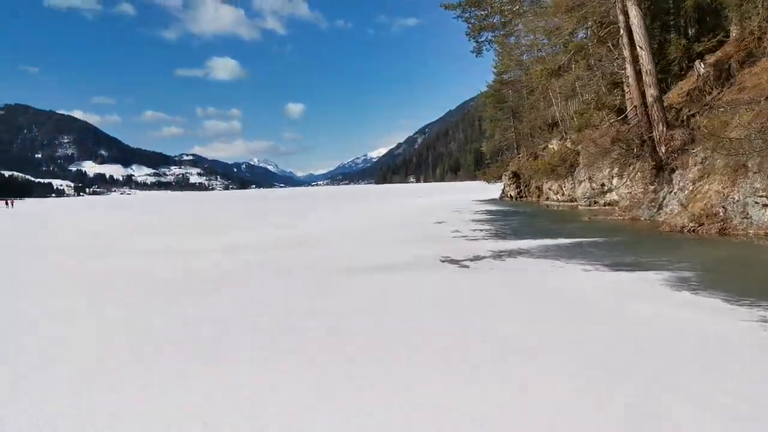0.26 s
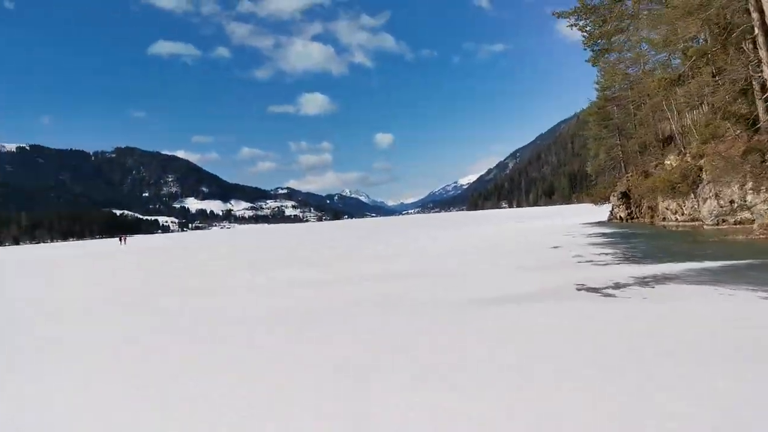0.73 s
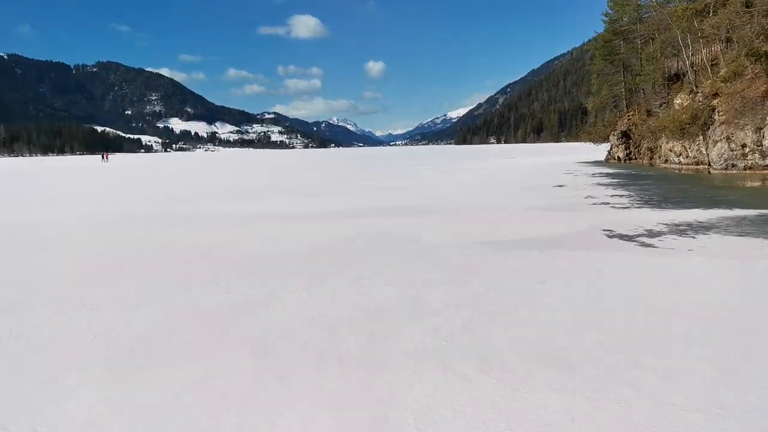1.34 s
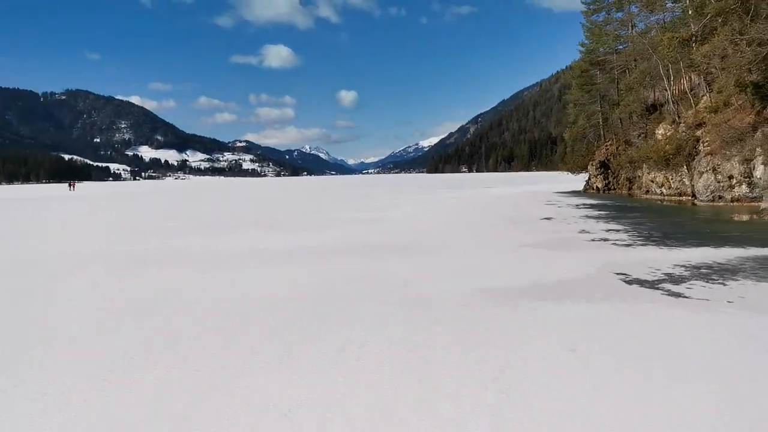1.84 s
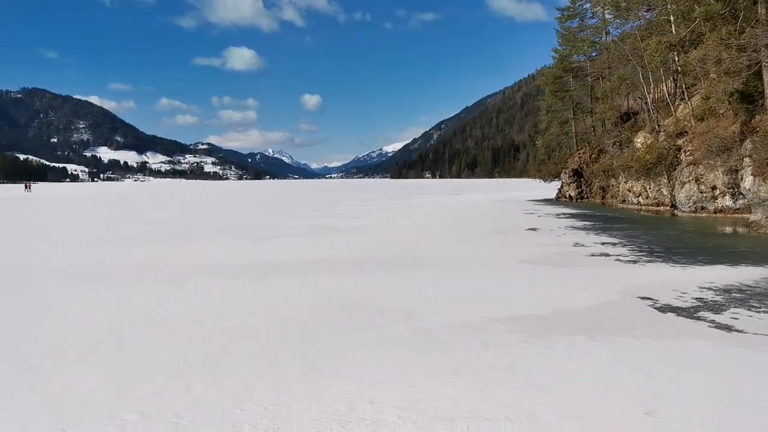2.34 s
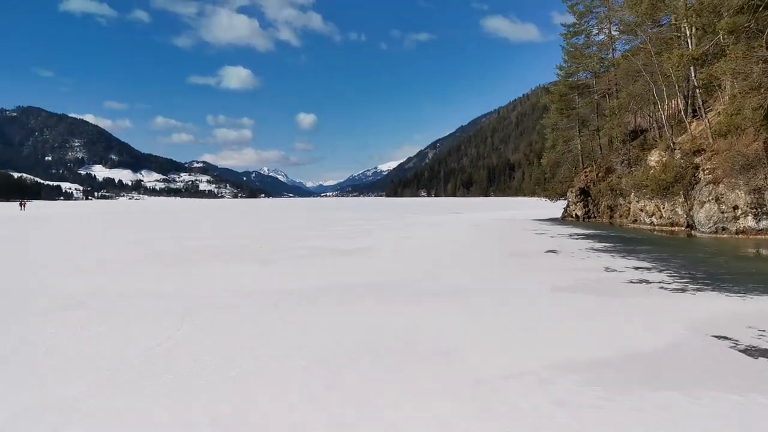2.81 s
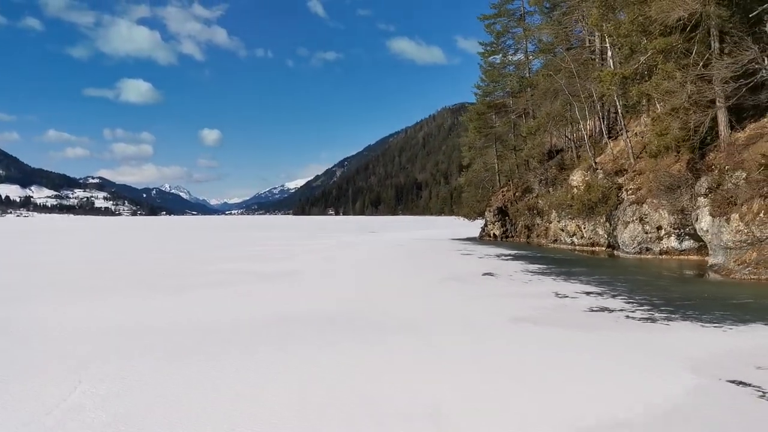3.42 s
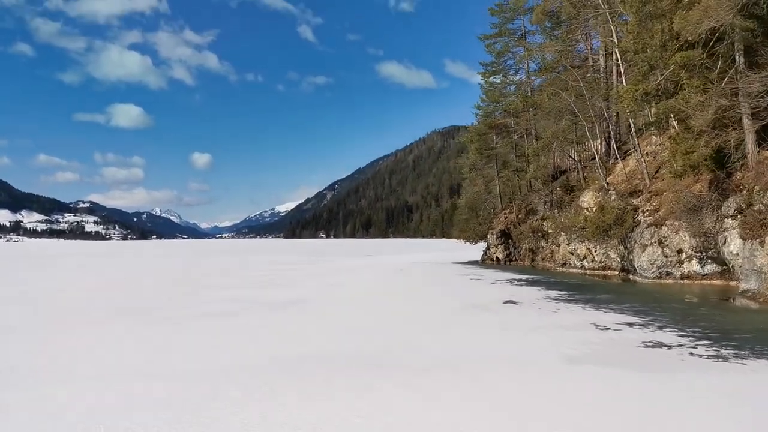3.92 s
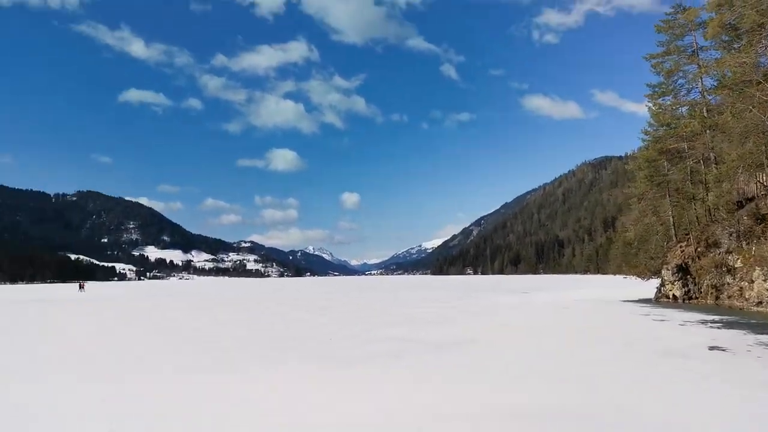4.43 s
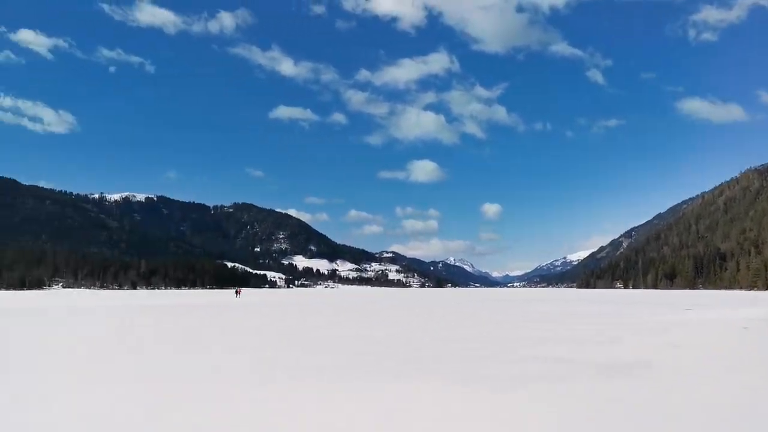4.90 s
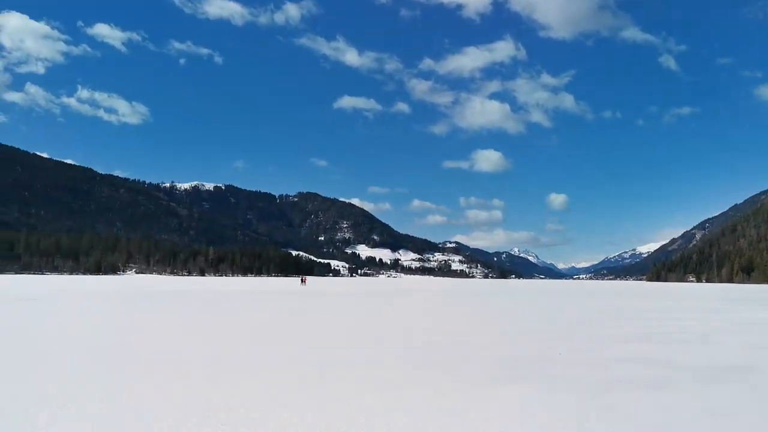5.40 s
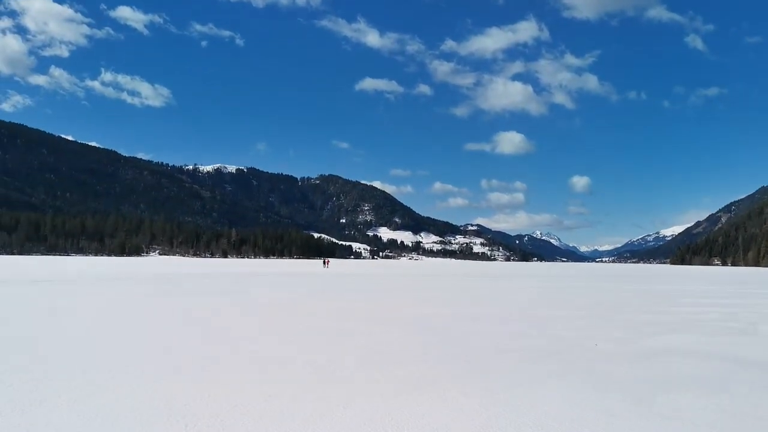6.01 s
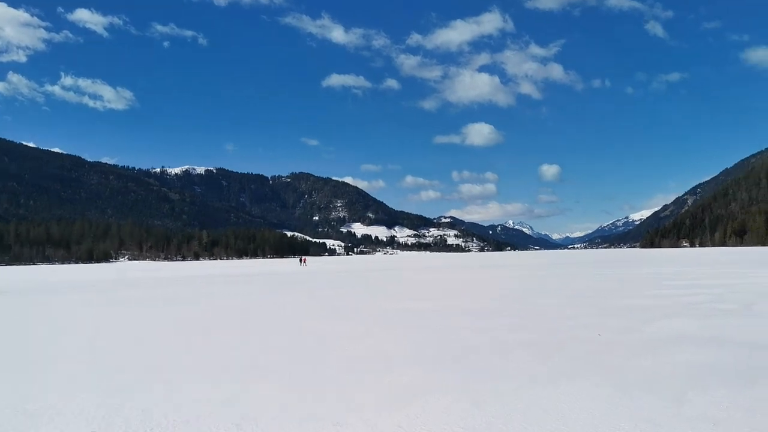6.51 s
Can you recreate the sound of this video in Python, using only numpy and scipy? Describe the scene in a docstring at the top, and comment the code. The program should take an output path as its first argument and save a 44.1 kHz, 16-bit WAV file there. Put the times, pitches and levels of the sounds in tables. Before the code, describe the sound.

Sharp icy snaps and gritty scraping under gliding skates thin out over a frozen lake, ending in a loud, fluttering wind buffet.

```python
"""Skating on snow-dusted lake ice

A skater glides along holding a camera. The crust snaps under the blades in sharp cracks, each a burst of
quick breaks that the ice sheet bends into a short falling chirp. Crushed crystals crunch where an edge scrapes;
the blades rumble softly in wandering noise bands and powder hisses along the steel.
Near the end a gust builds: low noise and fluttering roar buffet mainly the right microphone port."""
import sys
import numpy as np
from scipy import signal
from scipy.fft import rfft, irfft, next_fast_len
from scipy.io import wavfile
from scipy.ndimage import uniform_filter1d, map_coordinates

SR = 44100
rng = np.random.default_rng(int(sys.argv[2]) if len(sys.argv) > 2 else 0)


def file_out(sig):
    """Save sig as 16-bit WAV at sys.argv[1]."""
    # one column per channel
    cols = np.atleast_2d(sig).T
    # limit, then scale
    lim = np.clip(cols, -1, 1)
    pcm = np.round(lim * 32767).astype(np.int16)
    wavfile.write(sys.argv[1], SR, pcm)


N = 297675


def amp(db):
    """Decibels to gain."""
    return 10 ** (np.asarray(db) / 20)


def unit(x):
    """x scaled to rms 1."""
    return x / np.sqrt(np.mean(np.abs(x) ** 2) + 1e-20)


def along(points, hz):
    """(frequency [Hz], value) points read on a log-frequency axis."""
    f, value = np.transpose(points)
    return np.interp(np.log(hz + 1), np.log(f + 1), value)


def wobble(rate):
    """A smooth random curve with rate knots a second."""
    knots = rng.standard_normal(int(N * rate / SR) + 4)
    return map_coordinates(knots, [np.arange(N) * rate / SR])


def filtered(x, response):
    """x through a complex response of frequency."""
    m = 2 * next_fast_len(N // 2 + SR // 4)
    hz = np.fft.rfftfreq(m, 1 / SR)
    return irfft(rfft(x, m) * response(hz), m)[..., :N]


def causal(gain):
    """The minimum-phase response with this gain: it rings only after it is struck."""
    cepstrum = irfft(np.log(np.maximum(gain, 1e-6)))
    half = cepstrum.shape[-1] // 2
    cepstrum[1:half] *= 2
    cepstrum[half + 1:] = 0
    return np.exp(rfft(cepstrum))


def noise(spectrum, channels):
    """Unrelated coloured noises, together at rms 1."""
    white = rng.standard_normal((channels, N))
    return unit(filtered(white, lambda hz: amp(along(spectrum, hz))))


def grains(rate, spread_db):
    """Random impulses of very unequal size, rate a second, rms 1."""
    size = amp(spread_db * np.minimum(rng.exponential(size=N), 4))
    struck = rng.random(N) < rate / SR
    return unit(struck * size * rng.choice([-1, 1], N))


def patchy(x, depth_db, size=8):
    """Short-lived random resonances, a few hundred Hz wide and size frames long."""
    z = signal.stft(x, nperseg=256)[2]
    across_hz = uniform_filter1d(rng.standard_normal(z.shape), 2, 0)
    field = uniform_filter1d(across_hz, size, 1)
    return unit(signal.istft(z * amp(depth_db * unit(field)), nperseg=256)[1][:N])


def drone(hz, width_hz, wander):
    """A narrow band of noise whose pitch wanders, rms 1."""
    phase = 2 * np.pi * np.cumsum(hz * (1 + wander * wobble(6.7))) / SR
    return unit(wobble(width_hz) * np.cos(phase) + wobble(width_hz) * np.sin(phase))


CALM_DB = -74  # floor of the right port's curve
# the left port lies in the lee: where both ports agree [dB], and the share of a rise above it that gets there
LEE_EVEN_DB, LEE_SHARE = -68.5, 0.47


def swells(rows, rise_db_per_s, fall_db_per_s):
    """Each row rises, holds and dies away; the sheltered left port feels only part: dB, left and right."""
    t = np.arange(N) / SR
    levels = []
    for start, end, db in rows:
        before, after = np.maximum(start - t, 0), np.maximum(t - end, 0)
        levels.append(db - rise_db_per_s * before - fall_db_per_s * after)
    right = np.maximum(np.max(levels, axis=0), CALM_DB)
    left = LEE_EVEN_DB + LEE_SHARE * (right - LEE_EVEN_DB)
    return np.array([left, right])


# gusts at the right port, short peaks riding on long ones: (start [s], end [s], level before trims [dB])
GUST_SWELLS = [(0.175, 0.218, -46), (0.795, 0.874, -42), (5.297, 5.813, -42.5), (5.444, 5.55, -34.5),
               (6.21, 6.735, -25.5), (6.272, 6.29, -22.5), (6.333, 6.358, -22.5), (6.472, 6.518, -17),
               (6.574, 6.655, -17), (6.68, 6.7, -22)]
# colour of light wind on a port: (frequency [Hz], level [dB])
BREEZE_COLOUR = [(20,-15.5),(60,-1.5),(120,-8),(220,-14),(400,-43),(1000,-51),(3000,-100)]
# colour of strong wind on a port: (frequency [Hz], level [dB])
GALE_COLOUR = [(25,-32),(70,-5),(120,4),(200,0.5),(320,-5),(500,-21),(800,-34),(1300,-39),(2500,-68),(5000,-99)]


def gust_thumps(lump_db=1.5, gale_db=1.5, breeze_db=2.5, steepen=0.68):
    """Wind pressure thumps on each port separately; strong wind adds a second colour that drops away faster."""
    db = swells(GUST_SWELLS, rise_db_per_s=480, fall_db_per_s=290)
    db = db + lump_db * np.array([wobble(45), wobble(45)])
    light_db = np.minimum(db + breeze_db, -29)
    strong_db = db + gale_db + steepen * np.minimum(db + 22, 0)
    return amp(light_db) * noise(BREEZE_COLOUR, channels=2) + amp(strong_db) * noise(GALE_COLOUR, channels=2)


# eddies in the strong gust, at the right port: (start [s], end [s], level [dB])
EDDY_SWELLS = [(6.21, 6.244, -28.5), (6.276, 6.301, -23), (6.329, 6.347, -25.5), (6.39, 6.46, -32),
               (6.469, 6.492, -21), (6.51, 6.527, -25), (6.569, 6.644, -17), (6.678, 6.69, -22.5),
               (6.732, 6.742, -30)]
# colour of their roar: (frequency [Hz], level [dB])
ROAR_COLOUR = [(120,-25),(320,1),(600,-2.5),(850,-10),(1150,-18.5),(1500,-24),(2500,-47),(5000,-90)]


def eddy_roar(flutter_db=11.5):
    """Eddies tear off the casing with a roar that flutters alike at both ports."""
    flutter = unit(amp(flutter_db * np.tanh(wobble(260))))
    db = swells(EDDY_SWELLS, rise_db_per_s=1500, fall_db_per_s=903)
    return amp(db) * flutter * noise(ROAR_COLOUR, channels=2)


PORT_LIMIT = 0.94  # strongest pressure that wind can build up in a port (1 = full scale)


def wind():
    """Thumps and roar press on the ports, which saturate softly."""
    return PORT_LIMIT * np.tanh((gust_thumps() + eddy_roar()) / PORT_LIMIT)


# steady gliding, before trims: (time [s], rumble level [dB], hiss level [dB])
GLIDE_LEVELS = [(0, -75, -44), (.2, -53, -47.5), (.45, -60.5, -52), (.8, -49.5, -47), (1.05, -57.5, -52.5),
                (1.3, -52, -50), (1.7, -62, -50), (2.2, -53, -51.5), (3.4, -56, -51), (4.25, -49, -50),
                (4.6, -57.5, -53), (5.15, -47.5, -54.5), (5.4, -55, -54.5), (5.83, -51.5, -54),
                (6.4, -61, -52), (6.62, -61, -58.5)]


def glide_levels():
    """The rumble and hiss faders of the glide, in dB for every sample."""
    s, rumble_db, hiss_db = np.transpose(GLIDE_LEVELS)
    t = np.arange(N) / SR
    return np.interp(t, s, rumble_db), np.interp(t, s, hiss_db)


# colour of the blades' broad rumble: (frequency [Hz], level [dB])
RUMBLE_COLOUR = [(30,-7.5),(80,-1.5),(135,6.5),(240,-1),(350,-9.5),(700,-35),(1500,-46),(3000,-52.5)]


def blade_rumble(level_db):
    """The gliding blades drone in two wandering bands over a broad rumble."""
    rumble = amp(1.5) * noise(RUMBLE_COLOUR, channels=1)[0]
    rumble += amp(-7.0) * drone(130, 35, wander=0.075)
    rumble += amp(-4.0) * drone(230, 35, wander=0.09)
    return amp(level_db + 3.1 * wobble(7)) * rumble


# differences between the ports, as sound from the feet bends round the camera
# (frequency [Hz], left minus right [dB])
PORT_BALANCE = [(300,-.4),(600,-1.5),(1100,-5.5),(1650,-10.5),(2100,-6),(2650,7.5),(3600,0),(5500,3.7),(6300,12),(7700,7),(9000,2.4),(11000,0)]
# (frequency [Hz], left lead [radians])
PORT_LEAD = [(130,-.25),(450,-.6),(1150,-1.5),(1600,-1.25),(2100,-.55),(2500,-.7),(2800,-3.3),(4300,-3.8),(4900,-5.6),(6100,-6.8),(6800,-9.4),(8200,-12.4)]


def ports(x):
    """The camera's body shades and delays sound differently at its two ports."""
    def response(hz):
        tilt = amp(along(PORT_BALANCE, hz) / 2) * np.exp(.5j * along(PORT_LEAD, hz))
        pair = np.array([tilt, 1 / tilt])
        return pair / np.sqrt(np.mean(np.abs(pair) ** 2, axis=0))
    return filtered(x, response)


# colour of powder along the steel: (frequency [Hz], level [dB])
HISS_COLOUR = [(150,-19),(600,3.5),(1200,1.5),(2000,2),(2900,-5),(4200,-5.5),(6000,-7.5),(7400,-1.5),(9500,-33.5),(14500,-29),(16000,-43)]


def powder_hiss(level_db):
    """Powder hisses along the steel: one noise shared by the ports, and a weaker one unrelated between them."""
    shared = amp(-5.0) * ports(noise(HISS_COLOUR, channels=1)[0])
    return amp(level_db) * (shared + amp(-12.5) * noise(HISS_COLOUR, channels=2))


def crystal_ticks(level_db):
    """Single crystals tick between the cracks, each with its own colour."""
    return amp(level_db + 0.5) * patchy(grains(rate=260, spread_db=4.5), depth_db=5.0)


# colour of blade and ice at the microphones: (frequency [Hz], relative level [dB])
ICE_COLOUR = [(45,-22),(130,-4.5),(330,1.5),(650,0.5),(1100,-2.5),(1550,-4.5),(2000,-3.5),(2650,-15),(3300,-12.5),(3800,-10.5),(6200,-19.5),(7600,-19),(9600,-47.5),(14500,-55),(16000,-64)]


def ice_sheet(force, lag_s=0.000827):
    """Bending waves carry treble faster than bass: lag_s is their delay at 1 kHz."""
    def response(hz):
        bend = np.exp(-4j * np.pi * lag_s * np.sqrt(1000 * hz))
        return unit(causal(amp(along(ICE_COLOUR, hz)))) * bend
    return filtered(force, response)


def scatter(x, decay_s=0.00065, db=-2.5, left_db=3.5, size=2048):
    """Treble spreads off the skater's body and the ice, unrelated at the ports and a little stronger on the left."""
    treble = filtered(x, lambda hz: hz > 4000)
    fade = np.exp(-np.arange(size) / SR / decay_s)
    power = np.abs(signal.fftconvolve(treble ** 2, fade / fade.sum())[:N])
    colour = [(200, -20), (1000, -8.0), (2600, 12.0), (3600, -10.0), (5000, -2.5),
              (7300, 5.5), (9500, -16.5), (15000, -25.5)]
    sides = amp([[left_db / 2], [-left_db / 2]])
    return amp(db) * np.sqrt(power) * noise(colour, channels=2) * sides


# an edge bites as it sets in: extra level, strongest at the start, and how fast that fades
BITE_DB, BITE_S = 2.5, 0.0033
# a loaded blade thrums: pitch, width, share of the scrape, and the scrape level above which it is full
THRUM_HZ, THRUM_WIDTH_HZ, THRUM_SHARE, THRUM_FULL_DB = 355, 70, 0.9, -26
# an edge scrapes through snow, before snow and ice colour it; the sign of chatter is ignored:
# (start [s], end [s], level [dB], brightness [dB], chatter [dB])
EDGE_SCRAPES = [(0, 0.015, -27, 3, -2), (0.018, 0.07, -25, -1.5, 1.5), (0.073, 0.129, -37, 7.5, 1.5),
                (0.13, 0.168, -31, 6, -2.5), (0.203, 0.233, -35.5, 10.5, 19), (0.559, 0.565, -42, 10, 4.5),
                (0.663, 0.697, -37, 2.5, -8), (0.834, 0.937, -47.5, 6.5, 5), (0.947, 0.974, -57.5, 16, 3),
                (1.249, 1.275, -39.5, 11.5, -2), (1.278, 1.335, -48.5, 18, 4),
                (1.362, 1.384, -47.5, 13.5, 7), (1.459, 1.5, -43, 10.5, 20), (1.532, 1.56, -54.5, 18, 14),
                (1.567, 1.594, -56.5, 24.5, 6), (1.733, 1.802, -45.5, 4.5, 5),
                (1.842, 1.901, -38, 0.5, -11), (2.068, 2.125, -44, 5, 7), (2.338, 2.355, -38, -1, 23),
                (2.387, 2.405, -38, 2.5, -1), (2.555, 2.57, -32, -2, 3), (2.579, 2.628, -38.5, 1.5, 2),
                (2.646, 2.682, -45, 6.5, 19), (2.76, 2.775, -33.5, -7, -2), (2.822, 2.834, -36.5, 0, 3),
                (2.92, 2.944, -39, 0, 5), (2.941, 2.983, -43.5, 10.5, 5), (2.993, 3.013, -39.5, 2, 7),
                (3.069, 3.122, -43, 6, 8), (3.124, 3.145, -33, 2, -1), (3.275, 3.285, -42, 8.5, 8),
                (3.318, 3.422, -46, 5, 9), (3.499, 3.535, -39.5, 9, -6.5), (3.557, 3.58, -42.5, 3, -4),
                (3.597, 3.648, -44.5, 8, 5), (3.837, 3.877, -46, 10, -1), (4.009, 4.041, -34.5, 7.5, -10.5),
                (4.018, 4.118, -45.5, 5.5, 2), (4.124, 4.141, -30.5, 2.5, 4), (4.208, 4.321, -32, 4, 0.5),
                (4.334, 4.344, -31.5, 2.5, -1), (4.37, 4.394, -35, -1.5, 0),
                (4.403, 4.428, -30.5, -2.5, -2), (4.464, 4.495, -31, -3, -13),
                (4.517, 4.567, -54.5, 14, 14), (4.69, 4.77, -55, 6, 7), (4.877, 4.893, -40.5, 0.5, 5),
                (5.169, 5.24, -46.5, 4.5, 13), (5.456, 5.47, -38.5, 1, 15), (5.866, 5.886, -34, 1, 14),
                (5.917, 5.934, -36, 0.5, 2), (5.94, 5.967, -43, 3.5, 3), (6.051, 6.079, -61.5, 22.5, 2),
                (6.233, 6.317, -36.5, -5, 1), (6.405, 6.446, -36.5, 3, 2)]


def scrapes(rate=3500, spread_db=3, patchy_db=3.0, edge_s=0.0038, split_hz=1150, low_db=-5):
    """Snow crystals crush densely under an edge that bites in, then runs evenly or chatters; a loaded blade thrums."""
    t, chatter = np.arange(N) / SR, np.tanh(wobble(140))
    body, fizz, thrum = np.zeros((3, N))
    for start, end, db, bright_db, chatter_db in EDGE_SCRAPES:
        near = slice(max(round((start - edge_s) * SR), 0), round((end + edge_s) * SR))
        age = t[near] - start
        fade_in = np.clip(age / edge_s + .5, 0, 1)
        contact = fade_in * np.clip((end - t[near]) / edge_s + .5, 0, 1)
        bite_db = BITE_DB * np.exp(-np.abs(age) / BITE_S)
        drag = contact * amp(abs(chatter_db) * chatter[near] + bite_db)
        # bite and chatter reshape the scrape but leave its energy alone
        drag *= amp(db) * np.sqrt(np.sum(contact ** 2) / (np.sum(drag ** 2) + 1e-9))
        body[near] += drag
        fizz[near] += drag * amp(bright_db)
        thrum[near] += drag * THRUM_SHARE * amp(min(db - THRUM_FULL_DB, 0))
    crush = patchy(grains(rate, spread_db), patchy_db, size=4)
    # the skater's weight keeps the crushing force steady over about 0.02 s
    crush /= np.sqrt(np.abs(uniform_filter1d(crush ** 2, size=800)) + 1e-9)
    low = filtered(crush, lambda hz: 1 / (1 + (hz / split_hz) ** 4))
    snow = [(100, low_db), (400, -2.5), (800, -1.0), (1250, -0.5),
            (2000, 2.2), (4000, -3.5), (7000, 2.0), (12000, 4.0)]
    crunch = filtered(body * low + fizz * (crush - low), lambda hz: amp(along(snow, hz)))

    def blade(hz):
        loss = 1j * hz * THRUM_WIDTH_HZ
        return loss / (THRUM_HZ ** 2 - hz ** 2 + loss)
    return crunch + filtered(thrum * crush, blade)


# small cracks: middle-band level and its full range, thud and snap against the middle, flake pitch range
SMALL_DB, SMALL_RANGE_DB = -20.5, 11
SMALL_THUD_DB, SMALL_SNAP_DB = -1.5, -0.5
SMALL_LOW_HZ, SMALL_HIGH_HZ = 369, 2230


def small_cracks(break_s=0.00164, count=110):
    """Small flakes break at uneven intervals all along the glide: rows like those of CRUST_CRACKS."""
    when, strength, flake = rng.random((count, 3)).T
    times = (np.arange(count) + 1 + 2 * when) / (count + 3) * N / SR
    levels = SMALL_DB + SMALL_RANGE_DB * (strength - .5)
    pitches = SMALL_LOW_HZ * (SMALL_HIGH_HZ / SMALL_LOW_HZ) ** flake
    return [(s, db, hz, SMALL_THUD_DB, SMALL_SNAP_DB, break_s) for s, db, hz in zip(times, levels, pitches)]


# cracks of the crust, before the ice colours them; thud and snap are relative to the middle band:
# (time [s], energy [dB], flake pitch [Hz], thud [dB], snap [dB], time it takes to break [s])
CRUST_CRACKS = [(0.1325, -1.5, 1060, 16, 4, 0.002), (0.1576, 4, 1200, 8.5, 4.5, 0.0036),
                (0.2025, 4.5, 910, -11, 7, 0.0014), (0.2075, 4.5, 895, -6, 6, 0.0041),
                (0.2206, 4.5, 1070, 12, 3, 0.0036), (0.2598, 5, 900, -1, 4, 0.0022),
                (0.2666, 7, 1050, -18, -2.5, 0.00052), (0.2775, -0.5, 1160.0, -21, -1, 0.0092),
                (0.3129, 4.5, 1140, -10, 0.5, 0.00092), (0.3425, -1.5, 960, -20, 5, 0.0016),
                (0.3462, 6.5, 970, -13, 2.5, 0.0005), (0.4054, 2, 970, -22, -0.5, 0.00072),
                (0.4232, 9, 1210, -25, -10, 0.00046), (0.4264, 6, 1210, -16, 1.5, 0.00047),
                (0.4785, 12, 1160, -15, 0.5, 0.00078), (0.5016, 1.5, 980, -10.5, 4.5, 0.0038),
                (0.5068, -8.5, 590.0, 11.5, 2.0, 0.0017), (0.5695, 8, 785, -12, 2, 0.00089),
                (0.5718, 12, 1040, -14, 3, 0.00098), (0.5825, 6, 880, -6.5, -8, 0.0049),
                (0.5877, 8.5, 724, -5.5, -8, 0.0035), (0.5962, -1, 590.0, -3, -7, 0.0021),
                (0.6142, 3.5, 970, -17, 2.5, 0.00082), (0.6495, -12, 1710, -22, 5, 0.0021),
                (0.6831, 13, 1180, -2, -4.5, 0.0018), (0.6951, 3.5, 724, 1.5, -13, 0.0021),
                (0.731, 10.5, 1290, -18, 2, 0.00037), (0.7366, 2.5, 716, -7.5, -13, 0.0021),
                (0.7713, -1, 720.0, -2, -2.5, 0.0025), (0.8156, 4, 660, -14, -4.5, 0.00118),
                (0.8877, 4.5, 2500, -12, -9.5, 0.0035), (0.8962, 3.5, 1470, -4.5, -1.5, 0.0017),
                (0.9742, 9, 1340, 6, 3, 0.00079), (0.984, -3, 660, -5, 1.5, 0.0039),
                (1.0035, -7.5, 490.0, -2, -22, 0.0014), (1.039, 5, 890, -8, -2.5, 0.0015),
                (1.0445, -3.5, 870, -6, 1, 0.001), (1.0859, -11.5, 1720.0, -14, 5.5, 0.0017),
                (1.1141, 1.5, 1080, 0, 0.5, 0.0015), (1.1391, 0.5, 490.0, -15, -7, 0.0014),
                (1.1445, -2.5, 1280.0, 5, -2.0, 0.0023), (1.1689, -10.5, 2280, -7, -9, 0.0012),
                (1.1939, -3, 494, -4, -6.5, 0.003), (1.2445, -10, 1420, 8.5, 11.5, 0.0045),
                (1.2764, 3.5, 1460, 4, 6, 0.0028), (1.3767, -10.5, 1860, 13.5, 5.5, 0.0023),
                (1.412, 0, 2400, -22, 1, 0.0014), (1.4166, 1, 1120, 3, 3, 0.0052),
                (1.5155, -14.5, 1980, -10, 11, 0.001), (1.529, -13.5, 1830, -13, 13.5, 0.0015),
                (1.5707, -6.5, 1760, -25, 1.5, 0.0082), (1.6131, -5.5, 860, -19, 2, 0.002),
                (1.6385, -1.5, 1030, -18, 6.5, 0.0042), (1.6907, -2, 1080, -10, 8, 0.0027),
                (1.649, -8, 950, -11, -12, 0.0021), (1.7365, -12, 2070, -7, -1, 0.002),
                (1.7744, 3.5, 1360, -13.0, 4, 0.00059), (1.7827, -3.5, 590.0, -16, 4, 0.0045),
                (1.807, -6.5, 436, 5.5, 0.5, 0.0016), (1.8493, -6, 544, -23, 7, 0.0064),
                (1.8662, -8, 2300.0, 11, -13, 0.00076), (1.9355, -14.5, 1720, 8, 1.5, 0.0048),
                (2.001, -21, 1870, 9, 15, 0.0038), (2.079, -5, 800, -21, -3, 0.0021),
                (2.0982, -6, 2070, 11.5, -8, 0.00052), (2.1325, -10, 1580, 1, 7, 0.0047),
                (2.2193, -5.5, 650.0, 1.5, -6, 0.0016), (2.2486, -6, 1160.0, -12, -2, 0.0047),
                (2.2657, -5.5, 2350, -8, -22, 0.0052), (2.2915, -16, 1900, 8, 3, 0.0039),
                (2.3332, -5, 400.0, -0.5, -3, 0.0087), (2.3675, -2.5, 600, -1.0, -4, 0.0011),
                (2.4168, -2.5, 536, -1.5, -5, 0.0046), (2.4453, -1.5, 517, 4.5, 0.5, 0.0016),
                (2.4925, -19.5, 1560.0, 5, -10, 0.0026), (2.511, -13, 1860, 10, -4, 0.0014),
                (2.616, -4.5, 1700, 7, -6, 0.0011), (2.6409, 0.5, 1390, 3.5, -2, 0.0026),
                (2.6605, -12, 850, -8, -11, 0.0032), (2.7305, -3.5, 440.0, -1, -6.5, 0.0024),
                (2.7832, 2.5, 740, 5, 0.5, 0.00095), (2.872, -10.5, 1380, 3, -8, 0.003),
                (2.9087, -4, 965, -12, 1.5, 0.0048), (2.9695, -6, 895, 12.5, 4, 0.0037),
                (3.0325, -7, 1690, 6, 2.5, 0.0064), (3.151, -18, 1970, -1, 11, 0.0015),
                (3.172, -15.5, 1800, 4, 4.5, 0.0057), (3.2425, -13.5, 1000, 10, -6, 0.0039),
                (3.3475, -14, 870.0, -22, -7, 0.0076), (3.357, -11.5, 1700, -4, -2, 0.0024),
                (3.389, 1, 740, 7, -2, 0.00089), (3.4683, 2.5, 1710, 2, -4.5, 0.0085),
                (3.5517, -14, 1720.0, 12, 3, 0.0022), (3.6502, -2.5, 1090, -18, 0, 0.001),
                (3.6785, 2.7, 1240, 12, 3.5, 0.0021), (3.7176, -5, 850, -8, -0.5, 0.0018),
                (3.7574, -9, 870.0, -15, -4, 0.0021), (3.7927, -14, 2090.0, -4, -12, 0.0031),
                (3.8181, -4, 1070, -15, 0, 0.00031), (3.9025, -11, 850, -4, -4, 0.003),
                (3.989, -1, 720, 1.5, -18, 0.00095), (4.0943, -3.5, 590.0, -6, -6.5, 0.0061),
                (4.1494, 0.5, 1820, 0, -2, 0.0015), (4.1975, -11.5, 1100, -9, 2, 0.0024),
                (4.3085, -1.5, 700, 6.5, -23, 0.0027), (4.3256, 1, 400.0, -15, -15, 0.0092),
                (4.4312, -2, 1810, 4, -8, 0.00035), (4.4809, 0, 1480, 19, -3, 0.0043),
                (4.5089, -8.5, 650.0, 2, 1.5, 0.0031), (4.5708, -8.5, 550, 0, 0, 0.0027),
                (4.623, -14, 400.0, 3, -4.5, 0.0024), (4.6879, -4.5, 795, 8, -13.5, 0.0012),
                (4.744, -14, 1200, 9, -9, 0.0015), (4.8328, -15, 940, 7, -13, 0.0014),
                (5.0537, -11, 860, 9, 1.5, 0.0009), (5.2351, 2.5, 1020, 5.5, -3.5, 0.0012),
                (5.2515, -2, 594, -0.5, -2.5, 0.0023), (5.3404, -9.5, 2420, 6, -8, 0.00059),
                (5.3848, -10, 880, 4, -5.5, 0.0011), (5.486, -11.5, 730, 12, 0.5, 0.0043),
                (5.5183, -9, 2350, -2.5, -4, 0.002), (5.6546, -10.5, 1080, 17, 5.5, 0.0023),
                (6.0243, -5, 2410, 6.5, -6, 0.0063), (6.0923, -6.5, 2380, -5, 2.5, 0.0021),
                (6.1617, -3.5, 990, -44, -0.5, 0.00094), (6.236, -6, 900, 9, 2, 0.0033),
                (6.403, -0.5, 1100, 4, 3.5, 0.0026), (6.557, -2.5, 1310, -6, -8, 0.0012),
                (6.5154, -1.5, 2040, -10, -2.5, 0.0012), (6.6208, -4.5, 650, -8, -1.5, 0.0016),
                (6.7145, 7, 1410, -15, -8, 0.00056)]


def cracks(crumble=0.89, crumble_s=0.0021, crumble_share=0.91, creak_s=0.00062, second=0.63,
           thud_hz=257, body_hz=810, edge_hz=1760, snap_hz=2950, air_db=-1.5,
           ring_db=11.5, ring_octaves=0.28, size=2048, count=3):
    """Crystals start to give, the crust breaks in a few quick steps, crumbs follow; the flake rings briefly."""
    lead = size // 8  # samples of room for the creak before the break
    out, t, hz = np.zeros(N + size), (np.arange(size) - lead) / SR, np.fft.rfftfreq(size, 1 / SR)
    middle = (hz > 650) & (hz < 1450)
    for s, db, pitch_hz, thud_db, snap_db, break_s in list(CRUST_CRACKS) + small_cracks():
        # crumbs fall for longer after a slow break
        crumb_s = crumble_s + crumble_share * break_s
        crumbs = rng.standard_normal(size) ** 3 * np.exp(np.minimum(t / creak_s, -t / crumb_s))
        steps = np.append(0, break_s * (np.arange(count) + rng.random(count)) / count)
        sizes = np.append(1, second * rng.choice([-1, 1], count))
        breaks = sizes @ np.exp(-2j * np.pi * np.outer(steps + lead / SR, hz))
        force = breaks + crumble * rfft(crumbs) / np.linalg.norm(crumbs)
        # the steps ripple the spectrum finely; its broad shape belongs to the crust
        broad = np.abs(uniform_filter1d(np.abs(force) ** 2, size=36))
        force *= causal(1 / np.sqrt(broad + 1e-9))
        # big, low flakes are damped by the snow on them
        freedom = np.interp(pitch_hz, [400, 1000], [.2, 1])
        octaves = np.log2((hz + 1) / pitch_hz)
        flake_db = ring_db * freedom / (1 + (octaves / ring_octaves) ** 2)
        colour = [(thud_hz, thud_db), (body_hz, 0), (edge_hz, 0), (snap_hz, snap_db),
                  (8000, snap_db), (10500, snap_db + air_db)]
        burst = force * causal(amp(along(colour, hz) + flake_db))
        burst /= np.sqrt(np.mean(np.abs(burst[middle]) ** 2))
        out[round(s * SR) - lead:][:size] += amp(db) * irfft(burst)
    return out[:N]


def scene():
    """Cracks, scrapes and fine crackle pass through the ice, over the glide and the wind."""
    rumble_db, hiss_db = glide_levels()
    force = amp(-0.5) * cracks() + scrapes() + crystal_ticks(hiss_db)
    blades = ice_sheet(force)
    from_feet = ports(blades + blade_rumble(rumble_db))
    return from_feet + scatter(blades) + powder_hiss(hiss_db) + wind()


TOP_HZ = 15100


def record(dry):
    """The camera keeps nothing above its band limit."""
    return filtered(dry, lambda hz: hz < TOP_HZ)


dry = scene()
out = record(dry)
file_out(out)
```